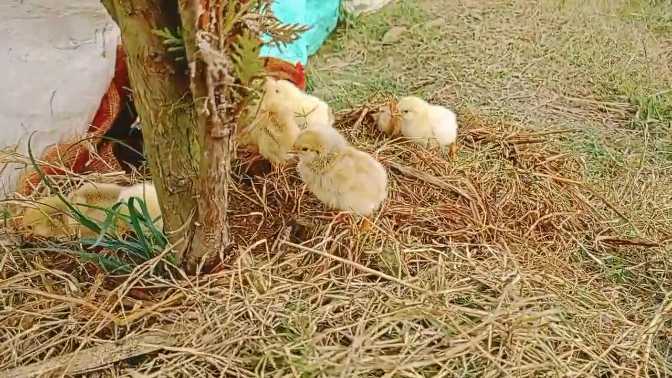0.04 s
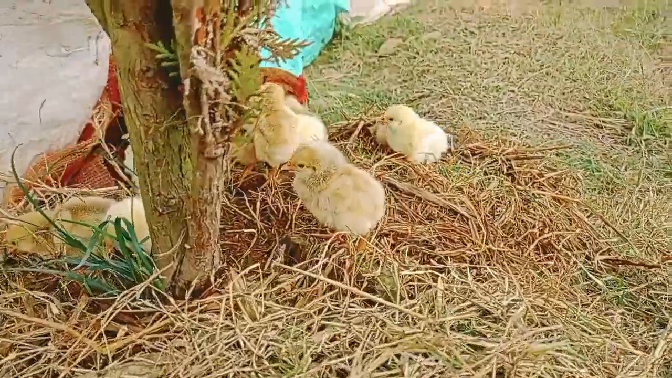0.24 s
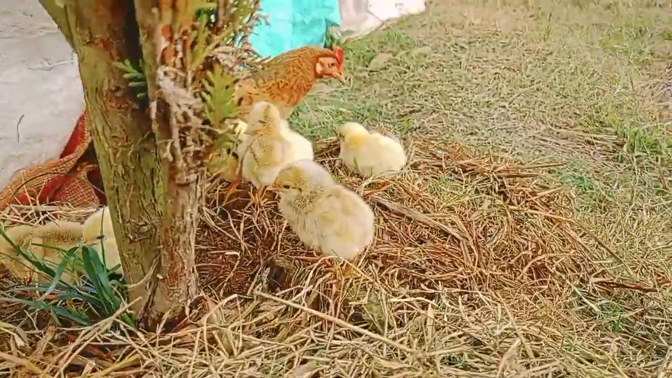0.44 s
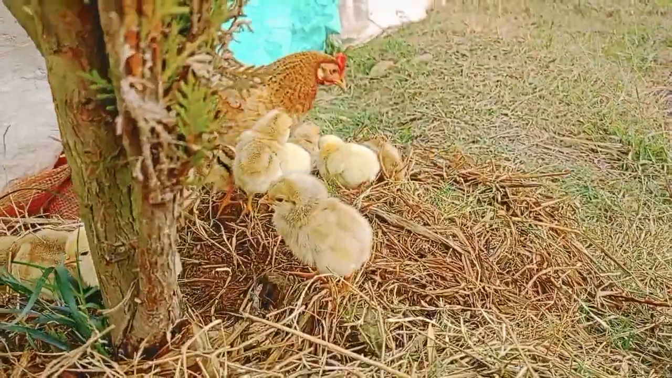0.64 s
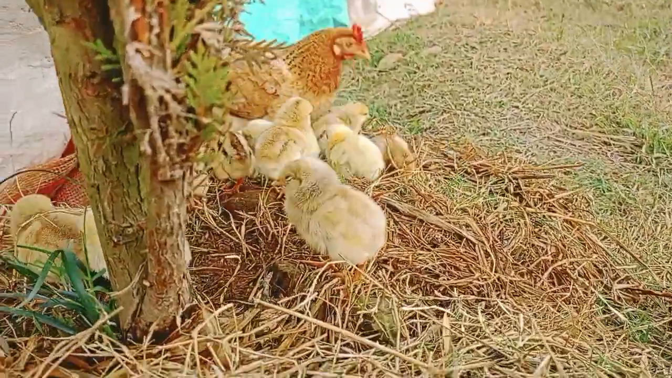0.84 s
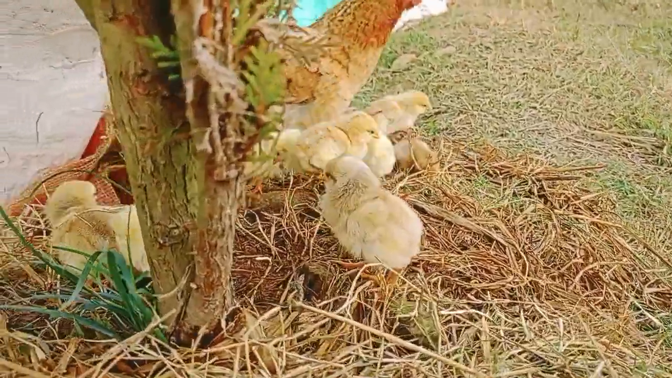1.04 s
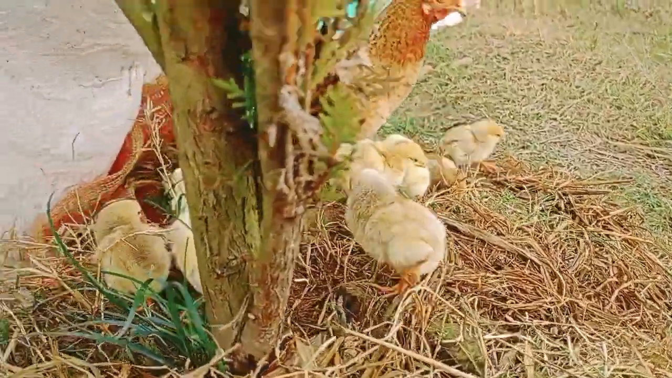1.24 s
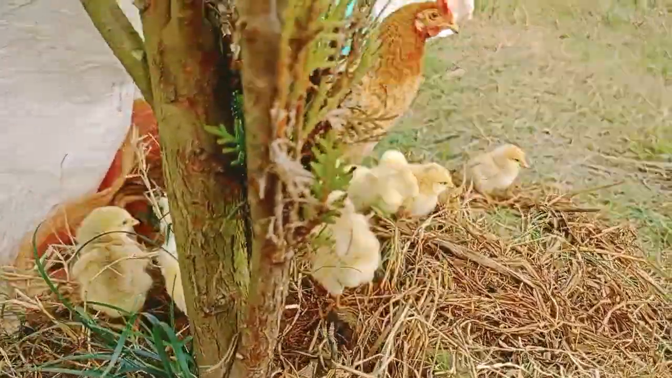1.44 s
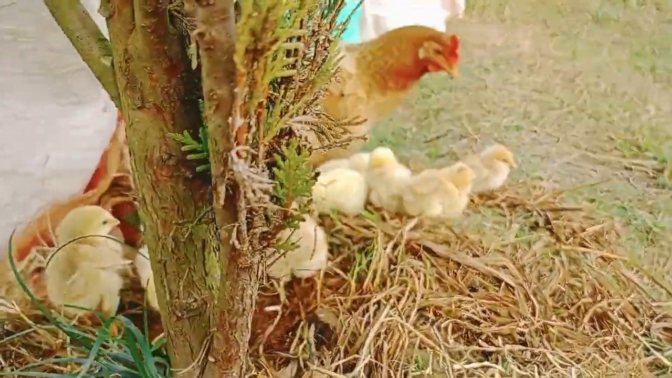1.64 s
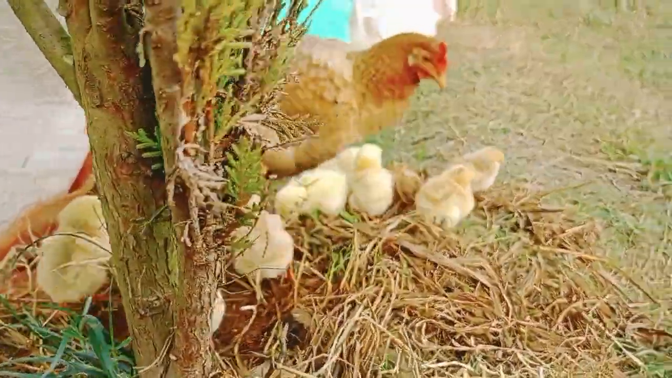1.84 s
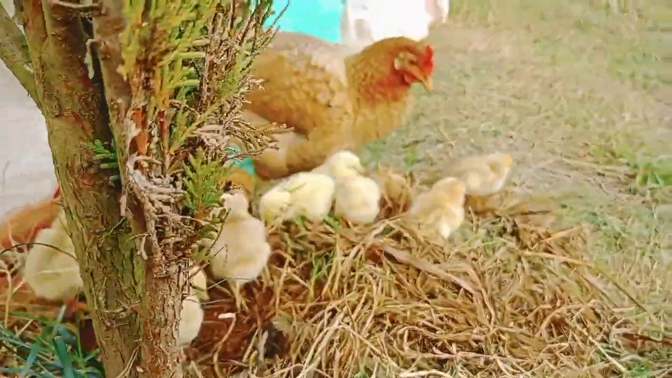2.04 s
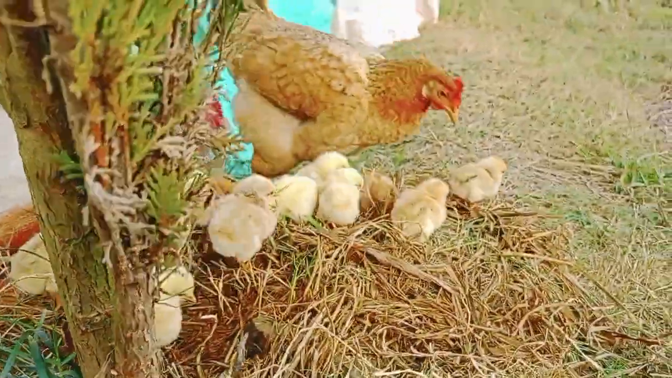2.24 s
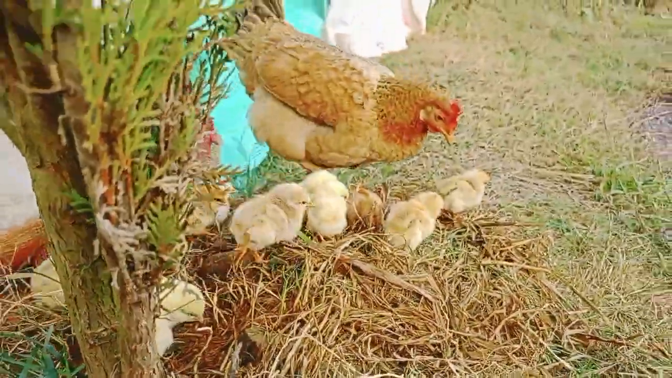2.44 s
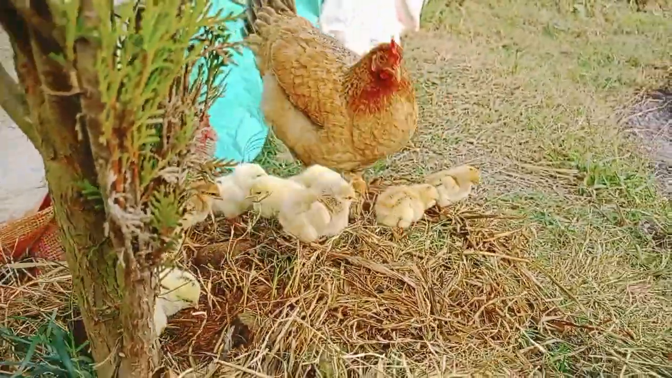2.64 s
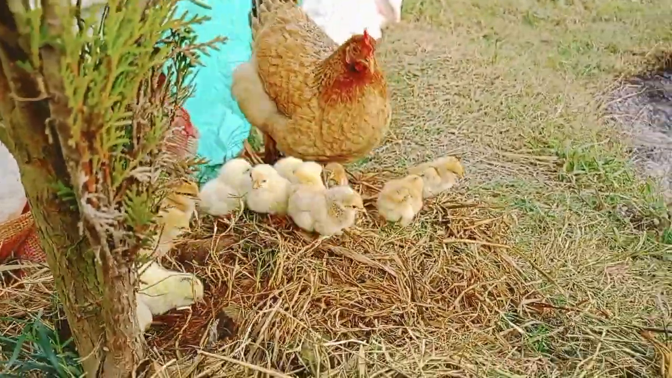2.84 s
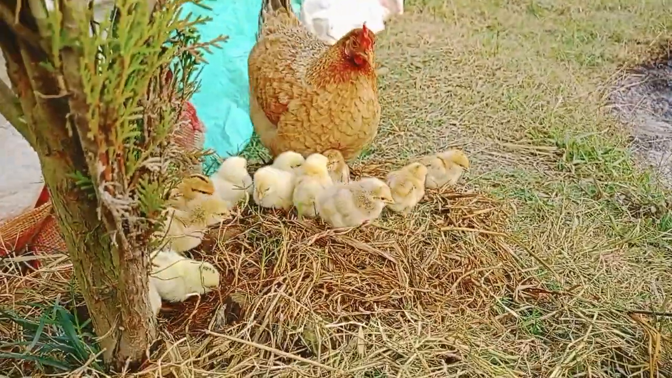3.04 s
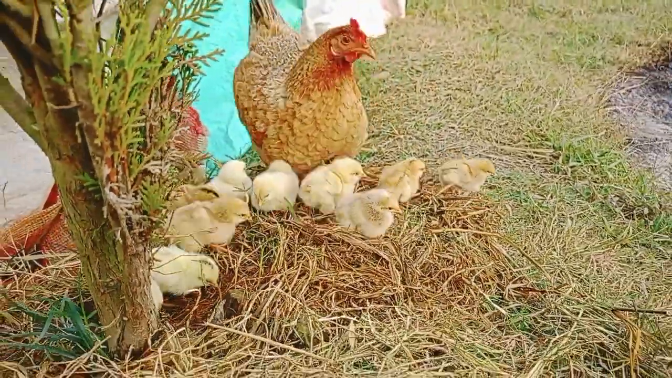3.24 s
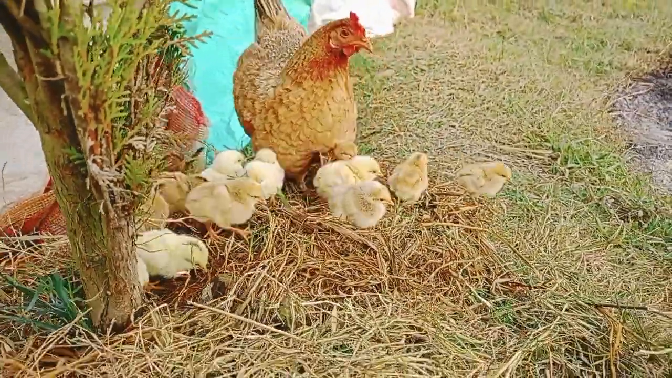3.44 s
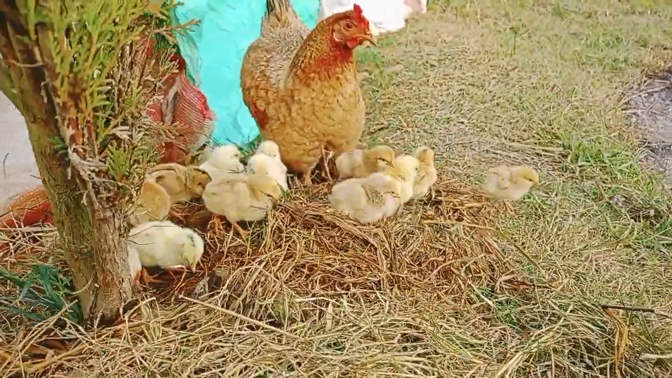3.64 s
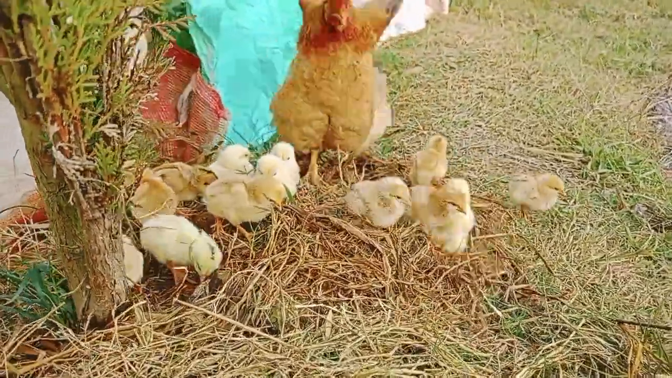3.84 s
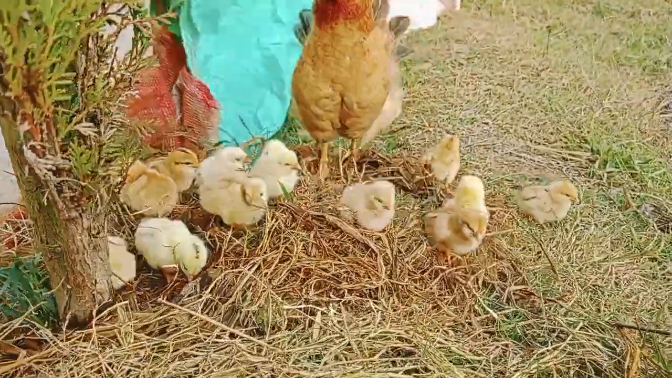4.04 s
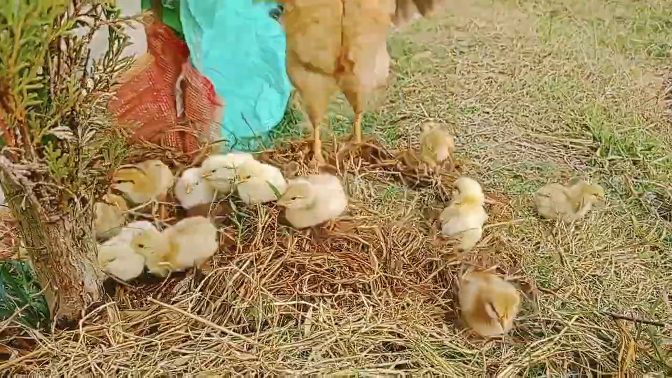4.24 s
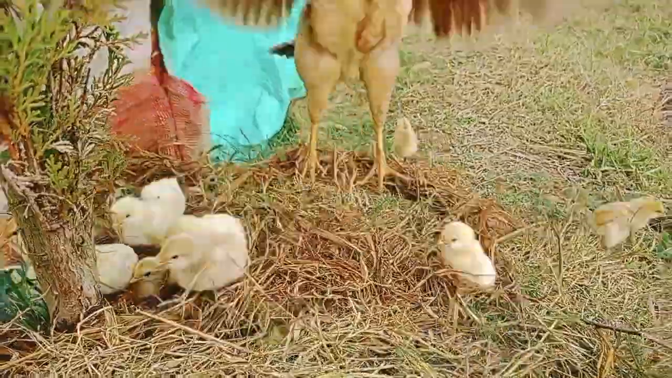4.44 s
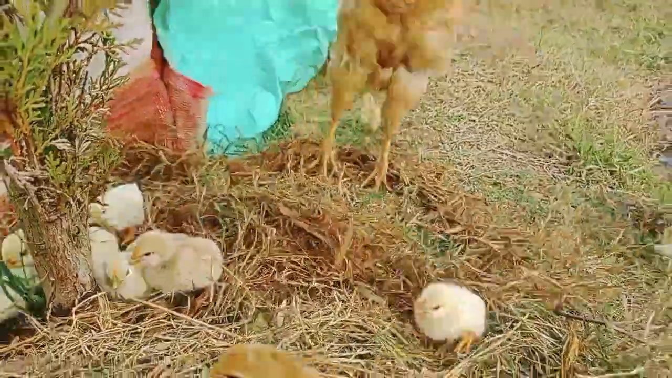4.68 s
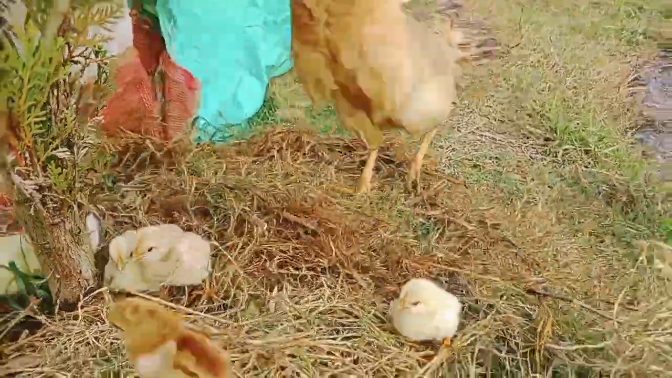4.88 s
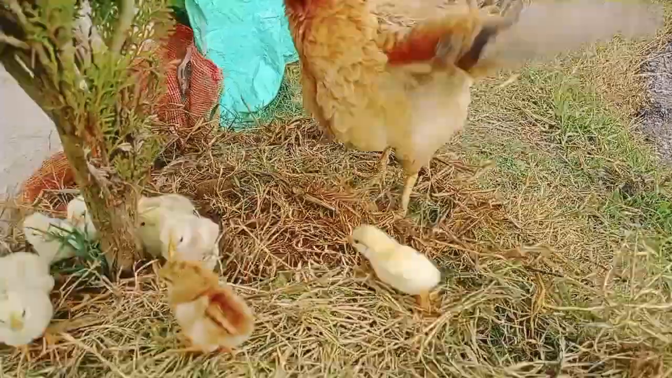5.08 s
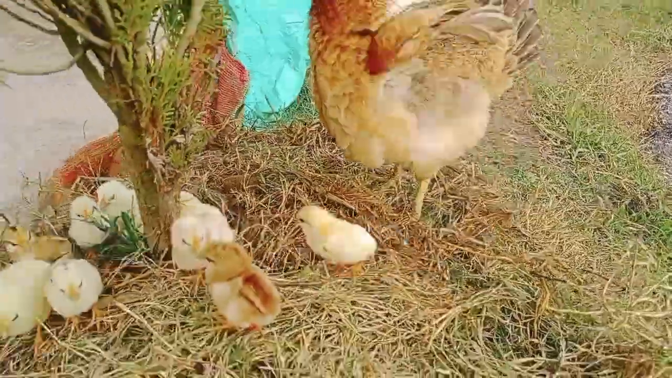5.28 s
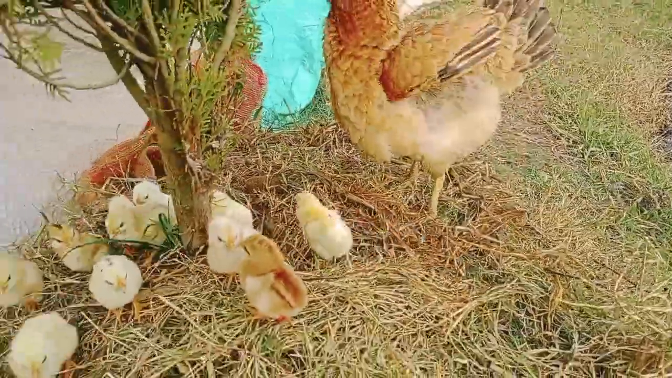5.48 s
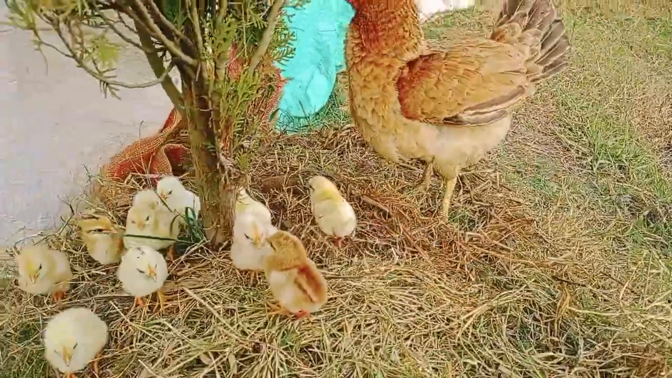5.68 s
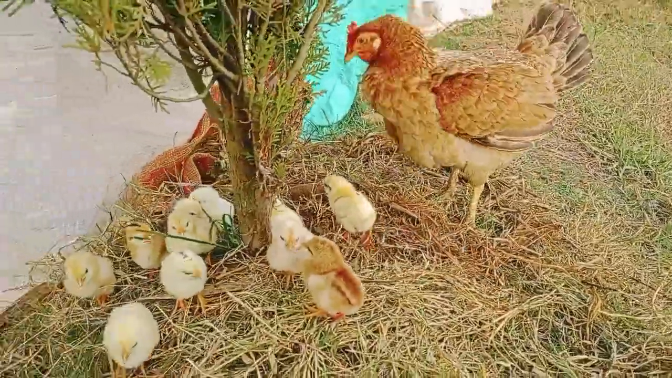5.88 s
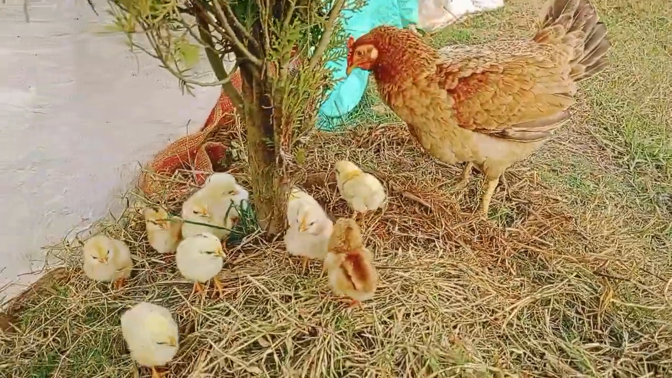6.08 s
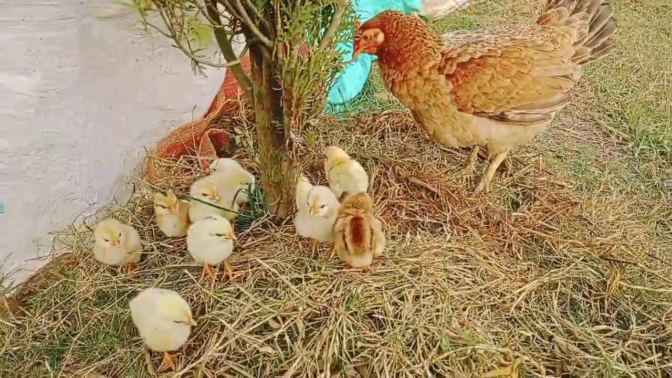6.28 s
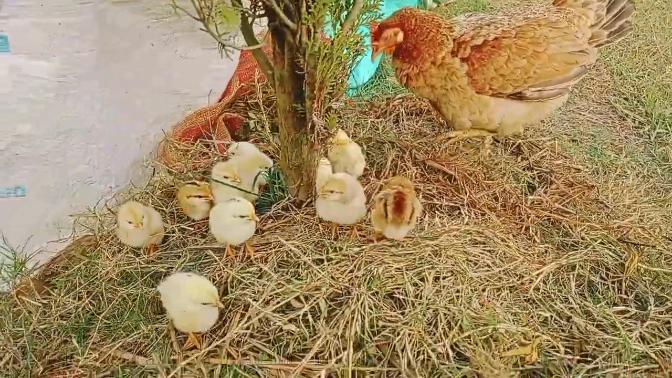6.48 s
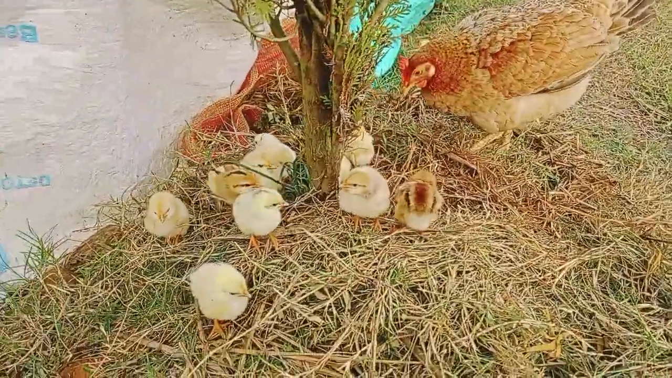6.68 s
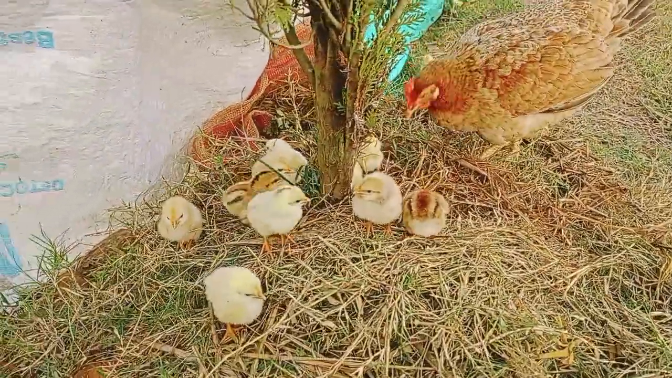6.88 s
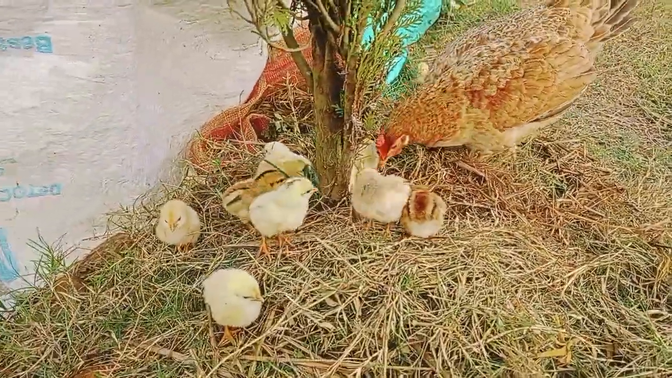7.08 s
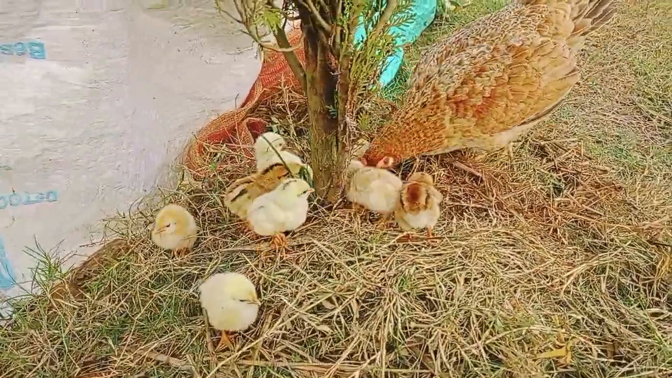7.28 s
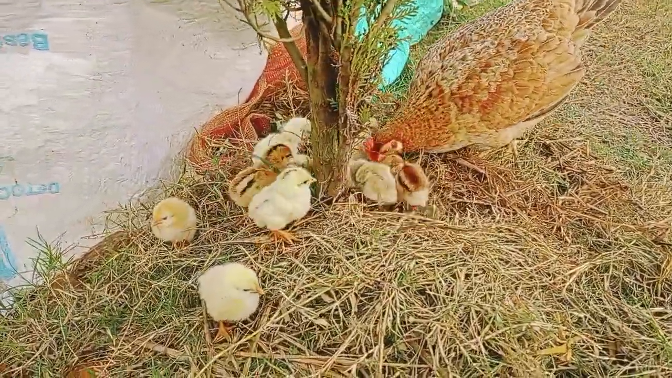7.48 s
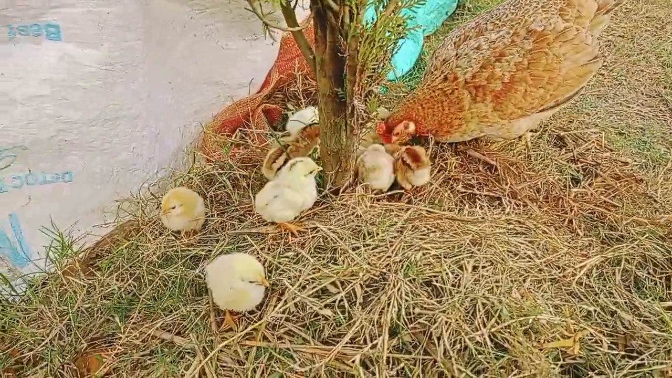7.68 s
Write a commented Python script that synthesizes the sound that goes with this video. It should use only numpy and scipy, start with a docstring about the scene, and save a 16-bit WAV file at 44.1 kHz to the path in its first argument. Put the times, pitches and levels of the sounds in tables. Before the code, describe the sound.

In a quiet farmyard, a brood of chicks keeps up a busy, high peeping near the microphone. A hen clucks briefly and scuffs the dry straw, then bursts into a single rasping squawk, by far the loudest sound, with thumping, swishing wingbeats. Afterwards come another cluck, light straw crackle and more peeping. Very faint insects and two distant cock crows sit behind it all.

```python
"""A farmyard with dry straw, close to a phone. Chicks peep throughout in near-sine whistles that arch and fall.
The hen clucks and coos softly, scrapes the straw, gives one harsh squawk and beats her wings. Her clucks
and squawk are trains of air puffs filtered by the resonances of her throat. Far off a cock crows twice;
one hoarse note buzzes early on; insects trill faintly over an open-air hush and a low rumble."""
import sys
import numpy as np
from scipy import signal
from scipy.fft import rfft, irfft
from scipy.io import wavfile
from scipy.ndimage import uniform_filter1d

SR = 44100
rng = np.random.default_rng(int(sys.argv[2]) if len(sys.argv) > 2 else 0)


def store_pcm(level_fs):
    """Save levels as 16-bit WAV."""
    pcm = np.round(np.clip(level_fs, -1, 1) * 32767).astype(np.int16)
    wavfile.write(sys.argv[1], SR, np.atleast_2d(pcm).T)


N = 340452


def chicks():
    """Superposition: around each near peep four fainter neighbours call, each with its own arch."""
    # near peeps: t/s, duration/s, top f/Hz, level/dB
    peeps = [(0.078, 0.063, 5340, -54.5), (0.136, 0.049, 3840, -49.5), (0.203, 0.025, 4220, -54),
             (0.262, 0.04, 4200, -52), (0.384, 0.047, 4060, -51.5), (0.399, 0.086, 5530, -54),
             (0.458, 0.053, 3930, -47), (0.554, 0.047, 4230, -49), (0.582, 0.064, 5080, -51),
             (0.63, 0.045, 4100, -47.5), (0.725, 0.022, 3600, -52), (0.749, 0.083, 4510, -51),
             (0.771, 0.092, 5390, -51.5), (0.802, 0.043, 4170, -43.5), (0.871, 0.076, 5100, -50.5),
             (0.912, 0.047, 5020, -50.5), (1.008, 0.06, 6060, -51.5), (1.143, 0.032, 3870, -44),
             (1.18, 0.047, 4380, -50), (1.232, 0.032, 4300, -48), (1.252, 0.072, 6040, -51),
             (1.259, 0.026, 4130, -48), (1.382, 0.064, 4460, -49), (1.406, 0.091, 5670, -48),
             (1.495, 0.022, 4080, -41.5), (1.578, 0.075, 4220, -52.5), (1.587, 0.047, 5670, -46.5),
             (1.67, 0.034, 4680, -55), (1.792, 0.059, 4520, -43), (1.88, 0.056, 4320, -53),
             (1.905, 0.072, 5100, -49.5), (2.008, 0.057, 4600, -51.5), (2.066, 0.08, 5820, -47),
             (2.231, 0.049, 3890, -48), (2.34, 0.073, 5820, -47), (2.384, 0.054, 4300, -44),
             (2.454, 0.049, 4100, -47.5), (2.563, 0.048, 4380, -49), (2.699, 0.052, 4200, -49),
             (2.747, 0.056, 5660, -48), (2.807, 0.092, 4130, -49.5), (2.872, 0.08, 4450, -47),
             (2.945, 0.062, 4720, -46.5), (3.042, 0.037, 4500, -44.5), (3.086, 0.042, 4720, -46),
             (3.109, 0.043, 4360, -47.5), (3.171, 0.066, 5500, -54), (3.3, 0.06, 4700, -44.5),
             (3.314, 0.021, 3900, -43), (3.422, 0.076, 4070, -45.5), (3.447, 0.052, 4990, -43),
             (3.548, 0.11, 5420, -50), (3.588, 0.084, 4530, -50), (3.646, 0.046, 4030, -36),
             (3.747, 0.039, 4240, -51), (3.818, 0.083, 5210, -47), (3.831, 0.067, 4360, -44),
             (4.545, 0.047, 5033, -34), (4.684, 0.054, 4860, -38), (4.936, 0.049, 5070, -37),
             (5.053, 0.029, 4790, -39.5), (5.125, 0.027, 3880, -45), (5.172, 0.025, 4600, -42),
             (5.273, 0.063, 4140, -45), (5.376, 0.075, 5020, -48.5), (5.397, 0.045, 3770, -40),
             (5.47, 0.025, 4250, -50.5), (5.527, 0.049, 4540, -45.5), (5.594, 0.069, 5080, -48),
             (5.655, 0.052, 4220, -50), (5.746, 0.075, 4980, -52.5), (5.857, 0.046, 4400, -41.5),
             (5.938, 0.062, 5120, -48), (5.98, 0.082, 4850, -44.5), (6.114, 0.03, 3630, -48.5),
             (6.171, 0.061, 3890, -50), (6.215, 0.04, 5800, -46.5), (6.319, 0.081, 5060, -57),
             (6.446, 0.037, 4200, -43), (6.483, 0.066, 5020, -50.5), (6.573, 0.046, 4850, -48.5),
             (6.637, 0.045, 3740, -52.5), (6.679, 0.056, 4090, -48), (6.735, 0.11, 5520, -54),
             (6.756, 0.085, 4780, -46), (6.764, 0.033, 4220, -50), (6.915, 0.12, 5160, -47),
             (6.974, 0.086, 5160, -44), (7.172, 0.1, 5350, -46), (7.279, 0.074, 5190, -49),
             (7.356, 0.12, 5400, -54), (7.404, 0.04, 3740, -51.5), (7.488, 0.1, 5020, -47),
             (7.572, 0.032, 4110, -46), (7.627, 0.033, 4220, -52.5)]
    out = np.zeros(N)
    draws = rng.random((len(peeps), 4, 4))
    for (s, length, top_hz, db), neighbours in zip(peeps, draws):
        peep(out, s, length, top_hz, db)
        for when, high, soft, arch in neighbours:
            top = 3800 + 2400 * high ** 3
            peep(out, s + .1 * when - .055, length=.02 + .04 * high, top_hz=top,
                 db=-50.5 - 16 * soft, bend=1.2 + 1.6 * arch, end_hz=1900 + .33 * top)
    return out


def peep(out, s, length, top_hz, db, bend=1.7, end_hz=3047):
    """Frequency modulation: a near-sine whistle hooks up, arches and falls ever faster, loudest late."""
    u = np.arange(-.22, 1.04, 1 / (length * SR))  # time / length, 0 at the top of the arch
    fall = end_hz + (top_hz - end_hz) * (1 - np.maximum(u, 0) ** bend)
    hook = 1 - 2.2 * np.minimum(u, 0) ** 2
    hz = fall * hook * (1 + .006 * walk(300, len(u)) + .012 * walk(60, len(u)))
    along = (u - u[0]) / (u[-1] - u[0])
    envelope = np.sin(np.pi * along ** 1.53) ** .53 * undb(4.56 * walk(154, len(u)))
    envelope *= (3047 / fall) ** .43  # the high opening is thinner than the low end
    phase = 2 * np.pi * np.cumsum(hz) / SR
    tone = np.sin(phase) + undb(-33) * np.sin(2 * phase)
    add(out, np.sqrt(2) * undb(db) * envelope * tone, max(s + u[0] * length, 0))


def squawk():
    """Source and filter: the strained syrinx flips rapidly between two registers; the throat resonates."""
    # course of the cry: t/s, level/dB, bias to the low register (0-1), roughness (0-1)
    course = [(3.95, -48.5, 0, .1), (3.966, -29.5, 0, .3), (4.005, -28, 0.02, 0.37),
              (4.022, -18.5, 0.07, 0.03), (4.068, -17.5, 0.14, 0.19), (4.15, -18, 0.87, 0.23),
              (4.21, -19, .5, .38), (4.5, -18, .15, .38), (4.55, -24.5, 0.52, 0.56),
              (4.585, -15.5, 0, 0.35), (4.64, -32, 0.42, 0.58)]
    # throat resonances: f/Hz, bandwidth/Hz, gain/dB
    formants = [(662, 210, 4), (1130, 241, 4.5), (1664, 210, -6), (2085, 170, -14.5), (2560, 380, -18.5),
                (3410, 740, -22.5), (5200, 390, -17), (7080, 820, -24.5)]
    high_hz, low_hz = 1060.6, 658.8
    t, db, low, rough = columns(course)
    flip = .5 + .5 * np.tanh(.85 * walk(230, len(t)))
    in_low = uniform_filter1d(1. * (flip < low), size=70)
    hz = (high_hz + in_low * (low_hz - high_hz)) * (1 + .2 * rough * walk(500, len(t)))
    hz *= 1 - .55 * np.exp(-(t - t[0]) / .025)  # the cry slides up into its pitch
    # puffs last as long in either register, so the slow ones are the sharper; weak effort rounds them
    effort = np.minimum(undb(db + 19.5), 1)
    puffs = air_puffs(hz, sharp=9 * effort * (high_hz / hz) ** 2)
    breath = puffs * (1 + 3.2 * rough * rng.standard_normal(len(t)))
    voice = sum((-1) ** k * undb(g) * ring(breath, f, w) for k, (f, w, g) in enumerate(formants))
    voice = np.tanh(level(voice, -6))  # soft saturation evens the loudness and makes it harsh
    out = np.zeros(N)
    add(out, level(voice, 0) * undb(db + 5 * rough * walk(200, len(t))), t[0])
    return signal.sosfilt(signal.butter(2, 350, "high", fs=SR, output="sos"), out)


def clucks():
    """Pulses excite resonances: a creak slides up to a whistle, breaks and drops with a louder pop."""
    # clucks: t/s, duration/s, peak level/dB
    calls = [(1.018, 0.047, -27.5), (1.589, .048, -27), (5.898, .051, -25.5)]
    # pitch contour: share of the duration, f/Hz
    contour = [(0, 260), (.2, 290), (.28, 520), (.6, 926), (.8, 625), (1, 290)]
    out = np.zeros(N)
    for s, length, db in calls:
        u = np.arange(0, 1.2, 1 / (length * SR))
        hz = np.interp(u, *np.transpose(contour)) * (1 + .14 * walk(250, len(u)))
        effort = (u < 1) * (.32 + np.exp(-((u - .82) / .1) ** 2))
        buzz = effort * air_puffs(hz, sharp=900 / hz)
        voice = ring(ring(buzz, 660, 520), 660, 520) + undb(1) * ring(buzz, 303, 150)
        add(out, undb(db) * voice / np.abs(voice).max(), s)
    return out


def coos():
    """Linear frequency glides: the hen's quiet, slightly wavering whistles."""
    # soft notes: t/s, duration/s, first f/Hz, last f/Hz, level/dB
    notes = [(2.748, 0.031, 640, 760, -54), (2.777, .026, 1165, 1400, -55.5),
             (3.859, 0.14, 1450, 1340, -55.5), (6.662, 0.15, 1457, 1424, -68)]
    out = np.zeros(N)
    for s, length, first_hz, last_hz, db in notes:
        size = int(length * SR)
        hz = np.linspace(first_hz, last_hz, size) * (1 + .01 * walk(150, size))
        tone = np.sin(2 * np.pi * np.cumsum(hz) / SR)
        add(out, undb(db) * np.sqrt(2 * np.hanning(size)) * tone, s)
    return out


def wings():
    """Displaced air: each beat gives a hollow thump, a swish of feathers and a gust on the microphone."""
    # wing beats: t/s, thump gain/dB, swish gain/dB
    beats = [(4.434, -20.5, -56), (4.529, -18.5, -38), (4.589, -46, -25.5), (4.654, -36, -30),
             (4.7, -13.5, -36), (4.742, -23.5, -32.5), (4.789, -16.5, -38), (4.84, -32, -44.5),
             (4.886, -17.5, -42.5), (4.975, -37.5, -61), (5.073, -45, -60.5)]
    # spectrum of the swish: f/Hz, relative level/dB
    feathers = [(100, -15.5), (900, 2), (10000, -27), (15500, -34)]
    gust_peak_s, gust_spread_s = 4.62, .17  # the gusts swell and fade over the bout
    out, t = np.zeros(N), np.arange(int(.09 * SR)) / SR
    thump = np.sin(2 * np.pi * 400 * t) * np.exp(-((t - .008) / .0026) ** 2)
    for s, thump_db, swish_db in beats:
        swish = level(colour(rng.standard_normal(len(t)), feathers), 7.74)
        swish *= np.exp(-np.abs(t - .006) / .015)
        add(out, undb(thump_db) * thump + undb(swish_db) * swish, s - .003)
        gust_db = -29 - 3 * ((s - gust_peak_s) / gust_spread_s) ** 2
        gust = level(noise_band(100, 220, len(t)), gust_db)
        add(out, gust * np.sin(np.pi * t / t[-1]) ** 2, s - .04)
    return out


def straw():
    """Friction and fracture: dry stalks scrape and crackle as each scuff of the feet swells and dies."""
    # scuffs: peak t/s, rise/s, crackle level/dB, scrape level/dB
    scuffs = [(2.9, 0.49, -76, -58), (3.19, 0.04, -46, -74), (3.38, 0.127, -51.5, -46),
              (3.68, .1, -63, -52.5), (3.82, .1, -59, -76), (4.6, 0.63, -42.5, -49.5),
              (5.0, 0.14, -58.5, -58.5), (6.5, 0.3, -65.5, -90), (7.55, 0.81, -63, -67.5)]
    # spectrum of the crackle: f/Hz, relative level/dB
    spectrum = [(60, -26), (400, -3), (2000, -11.5), (9000, -15.5), (12000, -27), (15000, -15)]
    swell_db, fall_per_rise = 12.5, .73
    t = np.arange(N) / SR
    crackle_gain = scrape_gain = 0
    for s, rise, crackle_db, scrape_db in scuffs:
        drop_db = swell_db * np.maximum((s - t) / rise, (t - s) / (rise * fall_per_rise))
        crackle_gain += undb(crackle_db - drop_db)
        scrape_gain += undb(scrape_db - drop_db)
    grains = rng.standard_normal(N) * undb(4 * walk(500, N) + 2.5 * walk(25, N))
    scrape = noise_band(1900, 1700, N) * undb(2.5 * walk(60, N))
    return level(colour(grains, spectrum), 0) * crackle_gain + level(scrape, 0) * scrape_gain


def snaps():
    """Damped oscillation: a snapping straw or a knock rings briefly and leaves a tail of noise."""
    # snaps and knocks: t/s, level/dB, ring f/Hz
    impacts = [(2.802, -38.5, 1200), (3.128, -27.5, 880), (3.144, -32.5, 750), (3.206, -32, 680),
               (3.224, -31, 666), (3.911, -36, 397), (6.682, -41, 2570), (7.045, -43.5, 2420)]
    out, t = np.zeros(N), np.arange(int(.06 * SR)) / SR
    for s, db, hz in impacts:
        tone = np.sin(2 * np.pi * hz * t) * np.exp(-t / .0023)
        tail = .5 * ring(rng.standard_normal(len(t)), hz, hz) * np.exp(-t / .016)
        add(out, undb(db) * (tone + tail), s)
    return out


def cock():
    """Attenuation with distance thins each crow to a falling, throbbing note with a weak octave."""
    # crows: t/s, duration/s, first f/Hz, first level/dB, last level/dB
    crows = [(1.854, 0.51, 996, -76, -65.5), (6.75, 0.762, 1268, -62, -70.5)]
    sag_hz_per_s = 310
    out = np.zeros(N)
    for s, length, first_hz, first_db, last_db in crows:
        t = np.arange(int(length * SR)) / SR
        waver = 1 + .0084 * walk(60, len(t)) + .0088 * walk(19, len(t))
        phase = 2 * np.pi * np.cumsum((first_hz - sag_hz_per_s * t) * waver) / SR
        tone = np.sin(phase) + undb(-20.5) * np.sin(2 * phase)
        db = np.linspace(first_db, last_db, len(t)) + 2.5 * walk(45, len(t))
        add(out, np.sqrt(2) * undb(db) * tone * signal.windows.tukey(len(t), .3), s)
    return out


def hoarse_note():
    """Random amplitude modulation roughens a short note that is strongest at its third harmonic."""
    size = int(.11 * SR)
    phase = 2 * np.pi * np.cumsum(960 * (1 + .012 * walk(300, size))) / SR
    note = np.sin(3 * phase) + undb(-20.5) * (np.sin(phase) + np.sin(2 * phase))
    out = np.zeros(N)
    add(out, note * undb(-48.5 + 6.4 * walk(185, size)) * np.hanning(size), s=.635)
    return out


def insects():
    """Impulse excitation: two trains of quick clicks ring a resonance; one fades as the other grows."""
    # distant trills: click rate/Hz, first level/dB, last level/dB
    trills = [(102.4, -81, -92), (92.5, -88, -77)]
    out = 0
    for rate, first_db, last_db in trills:
        rising = air_puffs(np.full(N, rate), sharp=10) > 0
        clicks = np.diff(1. * rising, prepend=0).clip(0)  # one a cycle
        trill = level(ring(clicks, hz=6950, width_hz=300), 0)
        out += trill * undb(np.linspace(first_db, last_db, N) + 2 * walk(20, N))
    return out


def yard():
    """Ambient noise: a broadband open-air hush under a low rumble that comes and goes."""
    # spectrum of the hush: f/Hz, relative level/dB
    spectrum = [(18, -46), (30, -26), (64, -6), (114, -5), (680, -19), (2700, -24), (4500, -27),
                (7000, -22), (8000, -32), (11300, -44), (15500, -36)]
    # course of the rumble: t/s, level/dB
    course = [(0, -68), (.5, -60.5), (.7, -82), (3.298, -67.5), (4.3, -51.5), (4.6, -41.5), (5.199, -85),
              (7.72, -91)]
    hush = level(colour(rng.standard_normal(N), spectrum), -62)
    rumble_db = np.interp(np.arange(N) / SR, *np.transpose(course)) + 2.5 * walk(7.2, N)
    return hush + level(noise_band(110, 110, N), 0) * undb(rumble_db)


def scatter(near):
    """Diffuse reflection: ground, bush and sacks return a faint, quickly decaying copy of near sounds."""
    t = np.arange(int(.12 * SR)) / SR
    response = undb(-43) * rng.standard_normal(len(t)) * np.exp(-t / .011)
    return signal.fftconvolve(near, response)[:N]


def air_puffs(hz, sharp):
    """Pulsed flow: a puff per cycle, of one size at any pitch; sharper puffs carry more overtones."""
    flow = np.exp(sharp * (np.cos(2 * np.pi * np.cumsum(hz) / SR) - 1))
    return np.diff(flow, prepend=flow[0]) / hz


def ring(x, hz, width_hz):
    """Two-pole resonance, gain 1 at the centre."""
    return signal.lfilter(*signal.iirpeak(hz, hz / width_hz, SR), x)


def noise_band(hz, width_hz, size):
    """White noise through two equal resonances in cascade."""
    return ring(ring(rng.standard_normal(size), hz, width_hz), hz, width_hz)


def colour(x, points):
    """Spectral shaping by a curve of points: f/Hz, gain/dB."""
    hz, db = np.transpose(points)
    f = np.maximum(np.fft.rfftfreq(len(x), 1 / SR), 1)
    return irfft(rfft(x) * undb(np.interp(np.log(f), np.log(hz), db)), len(x))


def walk(rate, size):
    """Random fluctuation: values held 1 / rate s and slewed; spread near 1."""
    hold = max(int(SR / rate), 1)
    steps = np.repeat(rng.standard_normal(size // hold + 1), hold)
    return 1.2 * uniform_filter1d(steps, hold)[:size]


def columns(table):
    """Linear interpolation: the sample times of a table's span and its columns drawn over them."""
    s, *rest = np.transpose(table)
    t = np.arange(int(s[0] * SR), min(int(s[-1] * SR), N)) / SR
    return (t, *[np.interp(t, s, c) for c in rest])


def undb(db):
    """Amplitude ratio of a level in dB."""
    return 10 ** (np.asarray(db) / 20)


def level(x, db):
    """Scales x to an RMS level in dB."""
    return x * undb(db) / np.sqrt(np.mean(x ** 2))


def add(out, x, s):
    """Superposes x on out from second s."""
    i = min(int(s * SR), N)
    out[i:i + len(x)] += x[:N - i]


def scene():
    """Superposition of the near sources, their reflections and the background, in one channel."""
    near = chicks() + squawk() + clucks() + coos() + wings() + straw() + snaps()
    return (near + scatter(near) + cock() + hoarse_note() + insects() + yard())[None]


def record(dry):
    """Band limiting: the phone cuts the top with a steep low-pass."""
    cutoff_hz = 15800
    return signal.sosfilt(signal.ellip(10, .2, 70, cutoff_hz, fs=SR, output="sos"), dry)


dry = scene()
out = record(dry)
store_pcm(out)
```